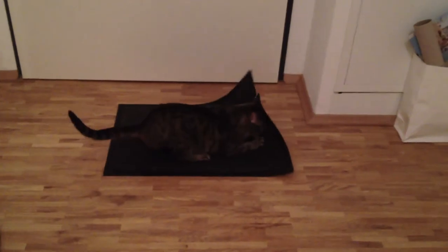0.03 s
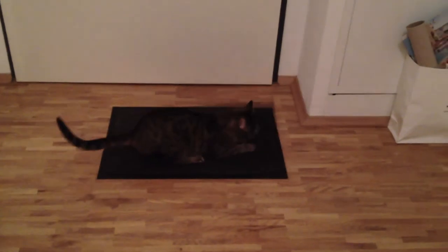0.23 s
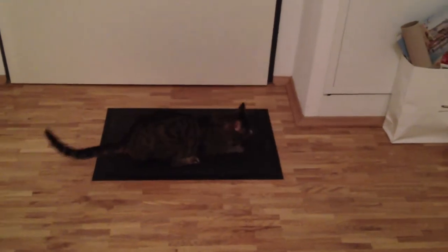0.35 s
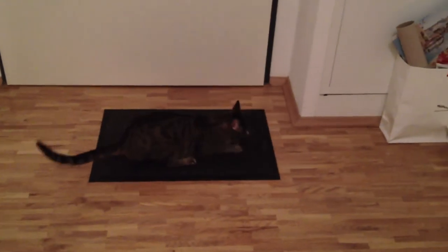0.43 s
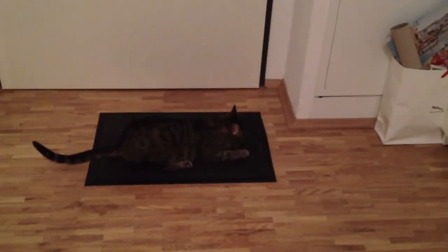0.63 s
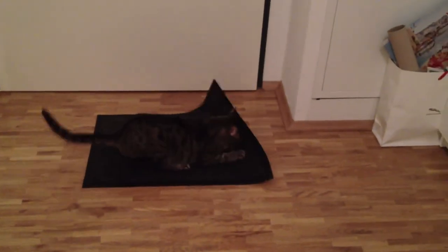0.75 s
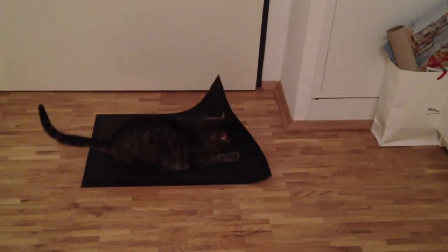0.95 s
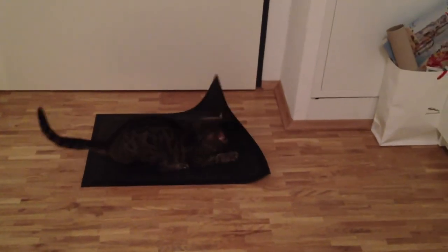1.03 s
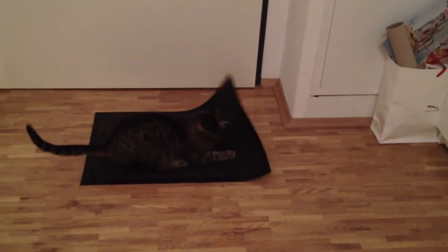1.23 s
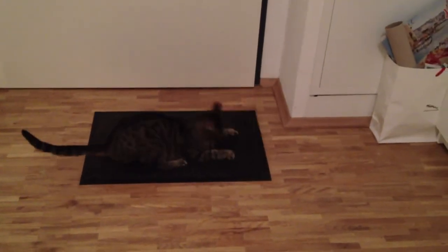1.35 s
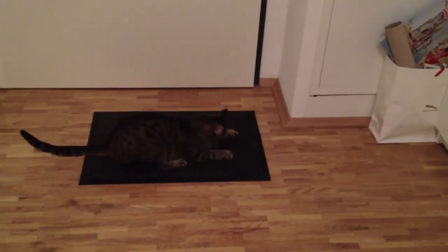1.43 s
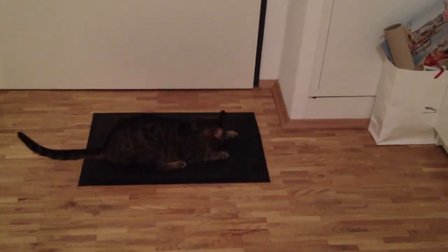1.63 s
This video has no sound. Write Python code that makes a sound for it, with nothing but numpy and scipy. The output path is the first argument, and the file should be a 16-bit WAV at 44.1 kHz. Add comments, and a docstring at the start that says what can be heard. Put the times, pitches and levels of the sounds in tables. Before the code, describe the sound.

Two slaps of a rubber-backed mat hitting floorboards ring briefly in a small, quiet hallway. The first is sharp, the second cushioned, with faint claw catches and rustling as a cat tugs at the corner.

```python
"""Two slaps of a rubber-backed door mat on a wooden floor, one crisp, one dull, as a cat tugs up its corner.
Each slap is a quick run of contacts that ring the boards and a small, bare hallway;
air squeezed from under the mat adds a thump. Around the slaps, claws catch in the pile
and the mat rustles and slips faintly over quiet room noise."""
import sys
import numpy as np
from scipy import signal
from scipy.fft import rfft, irfft
from scipy.io import wavfile

SR = 44100
rng = np.random.default_rng(int(sys.argv[2]) if len(sys.argv) > 2 else 0)


def master_out(mix):
    """Clip the mix to full scale and print it as 16-bit PCM to the path in sys.argv[1]."""
    frames = np.transpose(np.atleast_2d(mix))
    ceiling = np.clip(frames, -1, 1)
    pcm = np.round(ceiling * 32767).astype(np.int16)
    wavfile.write(sys.argv[1], SR, pcm)


N = 74970

# room noise spectrum: freq_hz, gain_db
ROOM_COLOUR = [(25, -43), (60, -22.5), (100, -6), (170, 8.5), (300, 5.5), (600, -2), (1200, -1.5),
               (1750, 4.5), (2300, -3.5), (5000, -8), (10000, -12), (15000, -11.5)]
# hallway decay: freq_hz, t60_s
HALL_DECAY = [(100, 0.5), (300, 0.54), (1000, 0.52), (2500, 0.57), (5000, .52), (9000, .43), (15000, .31)]
# rustle envelope: time_s, level_db
RUSTLE_ENVELOPE = [(0, -54), (0.029, -74.5), (.1, -72), (.55, -90), (.6, -71), (.78, -70), (.87, -92),
                   (0.883, -60.5), (0.914, -71), (0.944, -59.5), (1.041, -69), (1.12, -76.5), (1.245, -82),
                   (1.32, -76), (1.6, -82), (1.7, -80)]
# rustle spectrum: freq_hz, gain_db
RUSTLE_COLOUR = [(40, -47), (160, -10), (500, -1.5), (950, 8.5), (1700, 3.5), (3300, 0.5), (6000, -5),
                 (10000, -10.5), (15000, -7)]
# pile fibre spectrum: freq_hz, gain_db
PILE_COLOUR = [(40, -46), (160, -8.5), (500, -8), (1000, -2), (2200, -5.5), (5000, -7), (9000, -9.5),
               (15000, -19)]
# claw catches: start_s, length_s, level_db, ring_hz, width_hz, ring_db, tilt_db_per_octave
CLAW_CATCHES = [(0.1051, 0.0039, -48, 2840, 2370, 11, -1.5), (.1352, 0.0058, -47.5, 4230, 1210, 7.5, 0),
                (0.141, 0.031, -56, 1200, 198, 17, 1.5), (0.168, 0.0064, -46.5, 1220, 240, -12, 2),
                (0.175, 0.0054, -57.5, 1200, 240, 4, -2.5), (0.185, 0.066, -73.5, 1220, 200, 4, -9),
                (0.609, 0.0094, -55.5, 1200, 350, 10.5, -0.5), (0.631, 0.018, -62, 1040, 170, 22, -0.5),
                (0.7237, 0.0095, -54.5, 730, 330, 9, -.5), (1.324, 0.0092, -60.5, 2000, 1500, -6, 0),
                (1.479, 0.0098, -52, 2170, 696, 14.5, 2.5), (1.636, 0.046, -70.5, 1720, 280, 15, -3)]
# air cushion thumps: start_s, level_db, pitch_hz, decay_s
THUMPS = [(0.2483, -45, 110, 0.0071), (1.3598, -35.5, 574, 0.0042), (1.359, -50.5, 127, .006)]
# floor board resonances: freq_hz, width_hz, relative_db
BOARD_MODES = [(983, 49, 8.5), (1077, 20.4, 9.5), (1148, 47, -1), (1600, 130, 2.5), (1765, 15, -4),
               (2230, 54, -22), (3430, 180, -1), (4600, 220, 1.5)]
# first slap contacts: start_s, energy_db
CRISP_CONTACTS = [(.2444, -18.5), (.2452, -9), (.2473, -7.5), (.2479, -9), (.2527, -7.5), (.2566, -11.5)]
# first slap spectrum: freq_hz, gain_db
CRISP_COLOUR = [(30, -32), (80, -25), (160, -3), (430, -4), (620, -1.5), (1150, -1.5), (1300, -9),
                (1550, -2), (3600, -1), (5200, -5), (8300, -4.5), (9900, -10), (11500, -6.5), (15000, -13)]
# second, cushioned slap contacts: start_s, energy_db
DULL_CONTACTS = [(1.3593, -14.5), (1.3601, -13), (1.3615, -13.5), (1.368, -15.5), (1.3774, -17.5)]
# second slap spectrum: freq_hz, gain_db
DULL_COLOUR = [(30, -58), (80, -27), (160, 1), (330, 4), (600, 2), (790, -7.5), (1130, 1.5), (1350, -11.5),
               (1850, -11.5), (2300, -3), (3000, -9.5), (8300, -9.5), (10000, -13), (15000, -16)]


def undb(db):
    """Decibels to gain."""
    return 10 ** (np.asarray(db) / 20)


def unit_energy(x):
    """Scale to an energy of one."""
    return x / np.sqrt(np.sum(x ** 2) + 1e-18)


def over_hz(points, hz):
    """Interpolate a table on a log-frequency axis."""
    knots_hz, values = np.array(points, float).T
    return np.interp(np.log(np.maximum(hz, 1)), np.log(knots_hz), values)


def body(colour, modes=(), tilt_db_per_octave=0, size=4096):
    """Minimum-phase, unit-energy response: broad colour, tilt above 500 Hz, resonances."""
    hz = np.arange(size // 2 + 1) * SR / size
    gain = undb(over_hz(colour, hz) + tilt_db_per_octave * np.log2(np.maximum(hz, 500)))
    mode_power = sum(undb(db) ** 2 / (1 + (2 * (hz - ring_hz) / width_hz) ** 2)
                     for ring_hz, width_hz, db in modes)
    cepstrum = irfft(np.log(gain * np.sqrt(1 + mode_power)))
    return unit_energy(irfft(np.exp(rfft(2 * cepstrum[:size // 2], size))))


def through(x, response):
    """Convolve, trim to N samples."""
    return signal.fftconvolve(x, response)[:N]


def grains(per_s, roughness):
    """Tiny random clicks, rms one; roughness spreads their sizes."""
    clicks = (rng.random(N) < per_s / SR) * np.sign(rng.standard_normal(N))
    sizes = np.exp(roughness * np.clip(rng.standard_normal(N), -2, 2))
    return unit_energy(clicks * sizes) * np.sqrt(N)


def room_noise(level_db=-71):
    """Steady, quiet coloured noise."""
    return undb(level_db) * through(rng.standard_normal(N), body(ROOM_COLOUR))


def hallway(direct_db, early_db=-1, tail_db=3, gap_s=0.002, build_s=0.0016, early_decay_s=0.011):
    """Unit-energy response: direct path, door and wall echoes, diffuse tail whose treble dies first."""
    t = np.arange(N) / SR
    late_s = np.maximum(t - gap_s, 0)
    hz = np.arange(N // 2 + 1) * SR / N
    spectrum = rfft(rng.standard_normal(N))
    tail = 0
    for band_hz, t60_s in HALL_DECAY:
        band = over_hz([(knot_hz, knot_hz == band_hz) for knot_hz, _ in HALL_DECAY], hz)
        tail += irfft(spectrum * band, N) * np.exp(-np.log(1000) * t / t60_s)
    tail = unit_energy(tail * (1 - np.exp(-late_s / build_s)))
    early = unit_energy(grains(per_s=2000, roughness=0.62) * np.exp(-t / early_decay_s) * (late_s > 0))
    return unit_energy(undb(direct_db) * (t == 0) + undb(early_db) * early + undb(tail_db) * tail)


def mat_rustle():
    """The mat rustles as it is bent and pulled."""
    envelope = undb(np.interp(np.arange(N) / SR, *np.array(RUSTLE_ENVELOPE).T))
    return through(envelope * grains(per_s=2500, roughness=0.52), body(RUSTLE_COLOUR))


def mat_slip(start_s=1.252, end_s=1.355, level_db=-68):
    """Light, even fibre hiss as the corner slips out of the paws."""
    t = np.arange(N) / SR
    fibres = (t > start_s) * (t < end_s) * grains(per_s=4400, roughness=0.71)
    return undb(level_db) * through(fibres, body(PILE_COLOUR, tilt_db_per_octave=0.5))


def claw_catches():
    """Claws catch in the pile: short bursts of fibre clicks, one broad resonance each."""
    t, out = np.arange(N) / SR, 0
    for start_s, length_s, level_db, ring_hz, width_hz, ring_db, tilt_db_per_octave in CLAW_CATCHES:
        progress = np.clip((t - start_s) / length_s, 0, 1)
        stroke = np.sqrt(np.abs(np.sin(np.pi * progress)))
        burst = unit_energy(stroke * grains(per_s=5000, roughness=0.71)) * np.sqrt(length_s * SR)
        pile = body(PILE_COLOUR, [(ring_hz, width_hz, ring_db)], tilt_db_per_octave)
        out += undb(level_db) * through(burst, pile)
    return out


def air_thumps(low_cut_hz=180):
    """Air squeezed from under the falling mat: damped thumps with little deep bass."""
    t, out = np.arange(N) / SR, 0
    for start_s, level_db, pitch_hz, decay_s in THUMPS:
        age_s = np.maximum(t - start_s, 0)
        out += undb(level_db) * np.sin(2 * np.pi * pitch_hz * age_s) * np.exp(-age_s / decay_s)
    return signal.sosfilt(signal.butter(2, low_cut_hz, "high", fs=SR, output="sos"), out)


def mat_slap(contacts, colour, ring_boost_db, crack_db=-6.5, crack_decay_s=0.0011, smear_hz=2960):
    """The corner rolls down: each contact, a pulse with a rubber crack and own echoes, rings the boards."""
    t, pulses = np.arange(N) / SR, 0
    for start_s, energy_db in contacts:
        crack = undb(crack_db) * unit_energy(rng.standard_normal(N) * np.exp(-t / crack_decay_s))
        contact = hallway(direct_db=-3) + crack
        pulses += undb(energy_db) * np.pad(contact, (int(start_s * SR), 0))[:N]
    # all-pass: smears each pulse slightly, softening the slap's sharp attack
    _, poles = signal.iirpeak(smear_hz, Q=1.16, fs=SR)
    smeared = signal.lfilter(poles[::-1], poles, pulses)
    boards = [(hz, width_hz, db + ring_boost_db) for hz, width_hz, db in BOARD_MODES]
    return through(smeared, body(colour, boards))


def scene():
    """Room noise, the cat's play in the hallway and two slaps; mono."""
    background = room_noise()
    play = through(claw_catches() + mat_rustle() + mat_slip(), hallway(direct_db=1.5))
    crisp = mat_slap(CRISP_CONTACTS, CRISP_COLOUR, ring_boost_db=0.5)
    dull = mat_slap(DULL_CONTACTS, DULL_COLOUR, ring_boost_db=3)
    return (background + play + air_thumps() + crisp + dull)[None]


def record(dry):
    """Steep low-pass on the top treble."""
    cutoff_hz = 15300
    return signal.sosfilt(signal.ellip(10, 0.2, 70, cutoff_hz, fs=SR, output="sos"), dry)


dry = scene()
out = record(dry)
master_out(out)
```